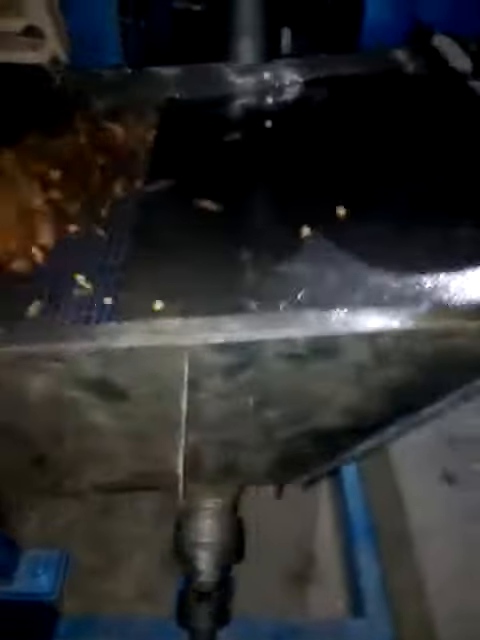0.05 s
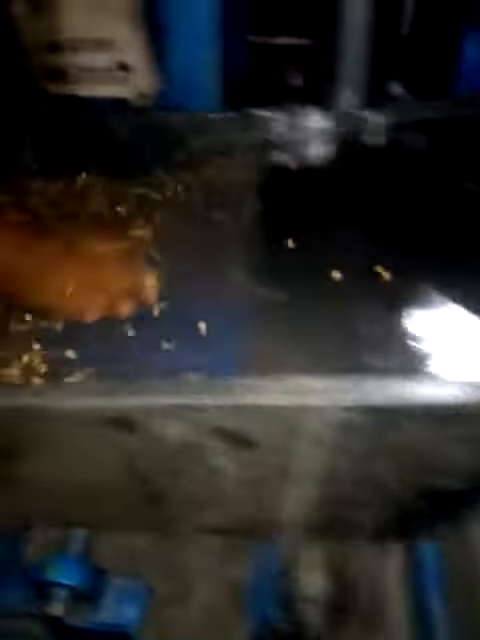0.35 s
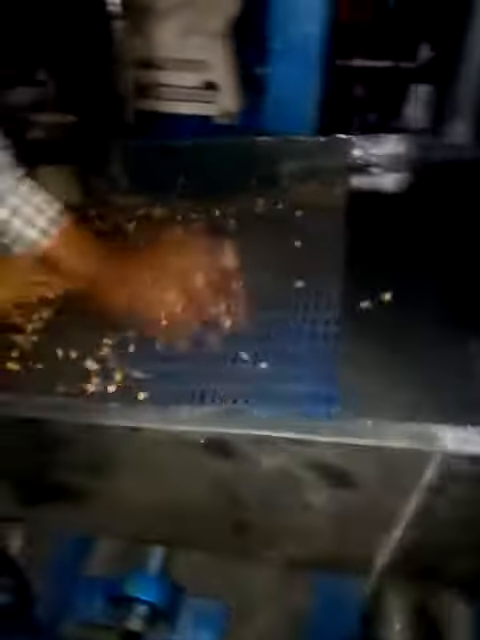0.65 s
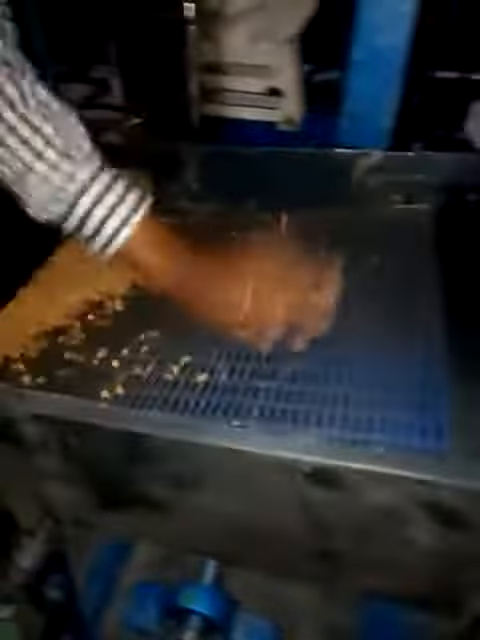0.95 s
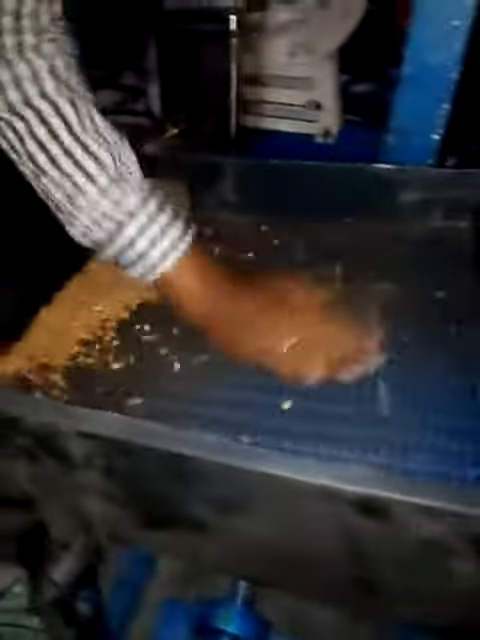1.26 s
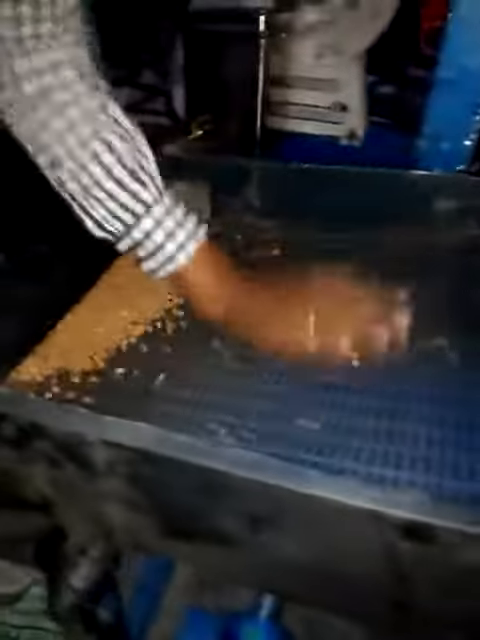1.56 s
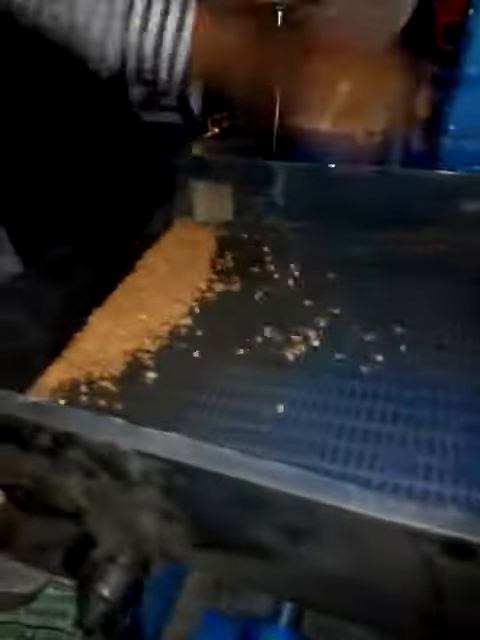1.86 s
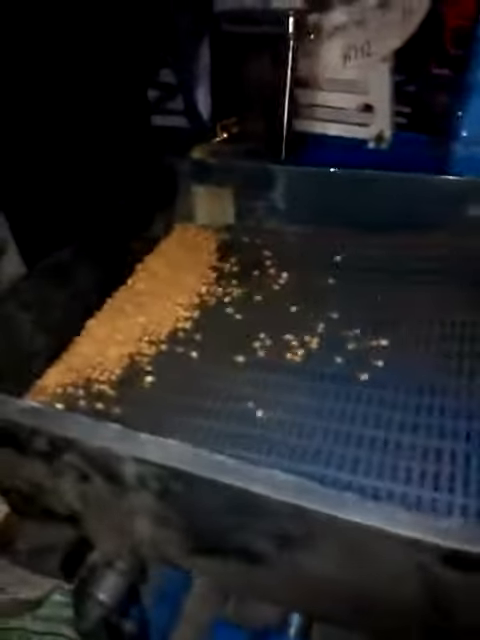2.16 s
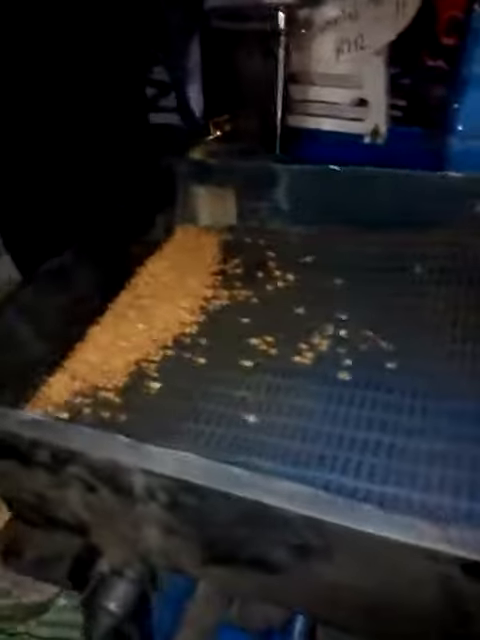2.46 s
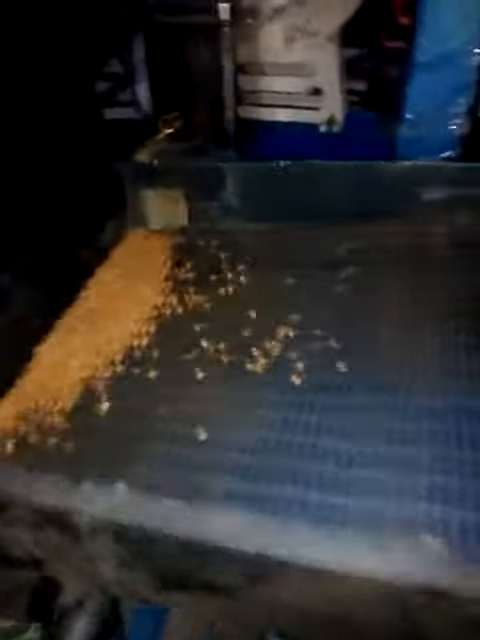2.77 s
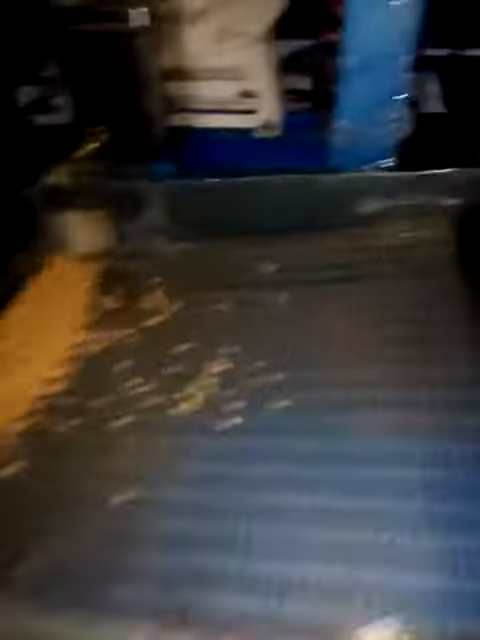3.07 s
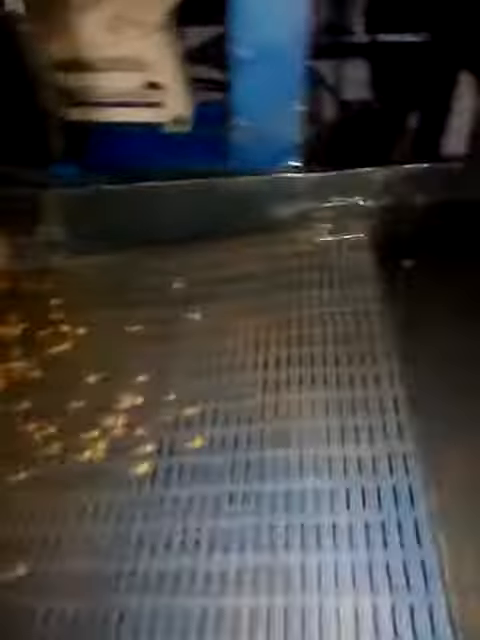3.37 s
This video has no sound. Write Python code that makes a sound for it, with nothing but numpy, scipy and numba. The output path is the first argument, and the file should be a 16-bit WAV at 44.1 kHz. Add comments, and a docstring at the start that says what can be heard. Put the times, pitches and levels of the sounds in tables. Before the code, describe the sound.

A loud, bright rush of grain on a steel screen continues throughout, close to the microphone and leaning left. Far beneath it are the low rumble of a small mill and the quick, faint knocking of its sieve. Early on, a hand moving the grain sets off a short run of dull metal clatters with a slight workshop echo. The hiss then carries on, and the motor's rough drone grows a little toward the end.

```python
"""Small grain mill in a workshop

Heard from just above the shaking sieve, thousands of kernels a second strike the steel and merge
into a loud hiss. The drive rumbles, and the sieve knocks once a stroke. For a few seconds the tray
clatters as a hand works the grain across it. The hiss overloads the left microphone."""
import sys
import numpy as np
from scipy import signal
from scipy.fft import rfft, irfft
from scipy.io import wavfile
from scipy.ndimage import uniform_filter1d, map_coordinates
from numba import njit

SR = 44100
rng = np.random.default_rng(int(sys.argv[2]) if len(sys.argv) > 2 else 0)


def to_wav(s):
    """Save 16-bit WAV."""
    ch = np.atleast_2d(s).T  # columns
    pcm = np.round(np.clip(ch, -1, 1) * 32767)  # PCM
    wavfile.write(sys.argv[1], SR, pcm.astype(np.int16))


N = 313110


# how strongly the grain flows: t/s, relative level/dB, left minus right/dB
GRAIN_FLOW = [(0.0, -13.3, 7), (4.2, -13, 9.3), (5.7, -12.45, 8.4), (7.1, -12.5, 8.6)]
# how sharp the impacts sound: t/s, treble boost/dB
SHARPNESS = [(0, 0), (2.5, -.4), (4.4, -1.6), (6.1, 2.1), (7.1, .4)]
def grain(left_db, right_db):
    """Kernels hiss on the steel screen; each microphone hears its own patch of it."""
    level_db, pan_db = curves(GRAIN_FLOW)
    extra_treble = undb(curves(SHARPNESS)[0]) - 1
    ears = []
    for ear, ear_db in enumerate([left_db + pan_db / 2, right_db - pan_db / 2]):
        hiss = screen_ring(kernels(ear), ear)
        if ear == 0:  # heard on the left only
            hiss = bright_resonance(hiss)
        hiss = hiss + extra_treble * band(hiss, hz=5950, width_hz=1200)
        hiss = wall_echo(hiss, lag_s=0.00141, sway_s=.00008, echo_db=-20.5)
        ears.append(unit(hiss) * undb(level_db + ear_db))
    return np.array(ears)


# tone of kernels hitting steel: f/Hz, left level/dB, right level/dB
KERNEL_TONE = [(1000.0, -20.5, -26), (1600.0, -18, -25.5), (2065, -15.0, -20), (2660, -9.5, -16),
               (3260, -6.5, -14.2), (4040, -1.44, -14), (4650.0, 0.5, -14.5), (5280, -3, -14),
               (6070, -5.5, -12.1), (6550, -10, -10), (7150, -15, -17), (8110, -23, -22.5),
               (10660, -31.5, -29), (15000.0, -31.7, -32.5)]
def kernels(ear, per_second=30000, size_spread_db=1, scatter_t60=0.0125):
    """Countless unequal impacts, each scattered through the hopper; ear 0 is left, 1 is right."""
    struck = rng.random(N) < per_second / SR
    impacts = struck * rng.standard_normal(N) * undb(size_spread_db * rng.standard_normal(N))
    t = np.arange(SR // 100) / SR
    burst = rng.standard_normal(len(t)) * fade(t, scatter_t60)
    scatter = np.exp(1j * np.angle(rfft(burst, N)))  # smears each click but keeps its tone
    scattered = irfft(rfft(impacts) * scatter, N)
    hiss = signal.sosfilt(signal.butter(2, 800, "high", fs=SR, output="sos"), scattered)
    return colour(hiss, np.array(KERNEL_TONE)[:, [0, ear + 1]])


# pitches at which the screen rings: f/Hz, width/Hz, left boost/dB, right boost/dB
SCREEN_RINGS = [(1890, 110, 1, 3.5), (2600, 180, 0, 2.5), (3266, 83, 2.5, 1), (3950, 110, 1.5, -2),
                (6250, 120, 1.5, 1), (6560, 72, 2.5, 2.5), (7420, 250, 0.5, 2.3), (8480, 230, 3, 4.2),
                (9060, 160, 4, 3), (10300, 170, 3.5, 3.5)]
def screen_ring(hiss, ear, wander_db=1.8):
    """The struck screen rings, and each ring swells and sinks as the grain shifts over it."""
    for hz, width, *boost_db in SCREEN_RINGS:
        gain = undb(boost_db[ear] + wander_db * walk(5))
        hiss = hiss + (gain - 1) * band(hiss, hz, width)
    return hiss


# pitch of a bright resonance in the hiss: t/s, f/Hz
BRIGHT_PITCH = [(0.0, 4610), (0.73, 4800), (4.2, 4570), (6.6, 4780), (7.1, 4650)]
def bright_resonance(hiss, boost_db=1.6, width_hz=290.0):
    """A narrow part of the hiss near 4.7 kHz stands out and drifts slowly in pitch."""
    return hiss + (undb(boost_db) - 1) * moving_band(hiss, curves(BRIGHT_PITCH)[0], width_hz)


def wall_echo(x, lag_s, sway_s, echo_db):
    """Sound bounces off the tray wall; its path changes as the hand-held microphone sways."""
    delay_samples = (lag_s + sway_s * walk(0.76)) * SR
    echo = map_coordinates(x, [np.arange(N) - delay_samples], order=1, mode="nearest")
    return x + undb(echo_db) * echo


# clatters of the tray, about seven a second: t/s, relative level/dB, favoured pitch f/Hz
TRAY_HITS = [(1.023, -6.8, 520), (1.195, -10.5, 560), (1.345, -12, 345), (1.385, -12.5, 600),
             (1.529, -17, 307), (1.634, -11.5, 339), (1.779, -13, 374), (1.929, -16, 363),
             (2.069, -16, 536), (2.189, -13.5, 339), (2.309, -15, 503), (2.439, -15.5, 194),
             (2.58, -12, 480), (2.721, -11.3, 519), (2.869, -15, 355), (2.985, -13.5, 256),
             (3.129, -11.5, 482), (3.269, -12.5, 495), (3.399, -11, 377), (3.519, -15.5, 258)]
def clatter(rebound_s=.048, rebound_db=-7.5):
    """The tray rattles as grain is worked over it; a weaker bounce follows each blow."""
    track = np.zeros(N)
    for s, db, hz in TRAY_HITS:
        for delay_s, blow_db in [(0, db), (rebound_s, db + rebound_db)]:
            rise_s = .009 * undb(-13 - blow_db)  # harder blows build up faster
            blow = tray_blow(hz, focus_db=11, crunch_db=2.2, crunch_t60=.25, rise_s=rise_s, vary_db=2)
            add(track, s + delay_s, undb(blow_db) * blow)
    return track


# how hard the sieve knocks: t/s, relative level/dB
KNOCK_STRENGTH = [(0, -3), (.5, -7), (4.0, 0), (4.8, -2), (5.5, 1.5), (6.3, 0), (7.1, -3.5)]
def shaker(first_s=.067, stroke_s=.2243, loose_s=.003, loose_db=.7, loose_pitch=.05):
    """The crank throws the sieve to and fro, one knock a turn; loose joints make no two alike."""
    track = np.zeros(N)
    strokes = np.arange(first_s, N / SR, stroke_s)
    for s, (late, hard, high) in zip(strokes, rng.standard_normal((len(strokes), 3))):
        hz = 490 * (1 + loose_pitch * high)
        blow = tray_blow(hz, focus_db=9, crunch_db=-5, crunch_t60=0.21, rise_s=0.0056, vary_db=2.5)
        add(track, s + loose_s * late, undb(loose_db * hard) * blow)
    return track * undb(curves(KNOCK_STRENGTH)[0])


# pitches at which the sheet-metal tray rings: f/Hz, level/dB, time to fade by 60 dB (t60)/s
TRAY_RINGS = [(105, -8, 0.11), (199, -6.5, 0.11), (272, -8.5, 0.19), (338, -1.8, 0.1), (361.3, -7, 0.17),
              (447, -5, 0.13), (492, -0.5, 0.13), (512.4, -5, 0.18), (547.4, -3.5, 0.18), (634, -7, 0.12),
              (783, -6, 0.16), (854, 1, 0.074), (946, -8, 0.078), (1180, -11, .1), (1370, -14, .08)]
# dull tone of grain thrown against the tray: f/Hz, level/dB
CRUNCH_TONE = [(50, -27), (120, -6), (300, 1), (550, -3), (900, -3.5), (1500, -5.5), (3000, -21),
               (6000, -38)]
def tray_blow(pitch_hz, focus_db, crunch_db, crunch_t60, rise_s, vary_db):
    """One blow: the tray rings, most near pitch_hz, and loose grain crunches against it."""
    t = np.arange(SR // 4) / SR
    hz, db, t60 = np.transpose(TRAY_RINGS)[:, :, None]
    size, detune, phase = rng.standard_normal((3, len(hz), 1))
    octaves_away = np.abs(np.log2(hz / pitch_hz))
    db = db + vary_db * size - focus_db * octaves_away
    tones = np.sin(2 * np.pi * (hz * (1 + 0.024 * detune) * t + phase))
    ring = np.sum(undb(db) * fade(t, t60) * tones, axis=0)
    crunch = colour(rng.standard_normal(len(t)), CRUNCH_TONE) * fade(t, crunch_t60)
    blow = (unit(ring) + undb(crunch_db) * unit(crunch)) * (1 - np.exp(-t / rise_s))
    return blow / np.sqrt(np.mean(blow[:SR // 50] ** 2))  # the first 20 ms set the strength


# tone of the rumbling frame: f/Hz, level/dB
FRAME_TONE = [(25, -14), (55, -19), (80, -10), (115, 0.6), (155, -2.7), (200, 1.5), (280, -1), (400, 0),
              (570, -2), (820, -2), (1050, -5.5), (1200, -4.5), (1500, -14), (2500, -25.5)]
# pitches at which the frame rings: f/Hz, width/Hz, boost/dB
FRAME_RINGS = [(190, 20, 3.5), (238, 16, 0), (387, 24, 0.5), (650, 23, 3), (795, 22, 5), (876, 26, 3.5),
               (1185, 36, 3.5)]
# the drive, which swells near the end: t/s, relative rumble level/dB, relative drone level/dB
DRIVE_LEVELS = [(0, -28.3, -48), (2.7, -26.8, -41), (4.3, -28.5, -44), (5.25, -27.6, -43),
                (5.4, -27, -35.5), (6.4, -26.6, -36.5), (6.75, -26.6, -30.5), (7.1, -26, -41)]
def drive(drone_db, drone_hz, filter_width_hz):
    """The frame rumbles unevenly and the motor shakes out one low, rough drone."""
    frame_db, motor_db = curves(DRIVE_LEVELS)
    mid, side = (unit(colour(noise, FRAME_TONE, FRAME_RINGS)) for noise in rng.standard_normal((2, N)))
    rumble = spread(mid, side, apart_hz=900) * undb(frame_db + 0.56 * walk(20))
    drone = band(rng.standard_normal(N), drone_hz, filter_width_hz)
    drone = unit(band(drone, drone_hz, filter_width_hz))  # a second pass makes the pitch clearer
    return rumble + drone * undb(motor_db + drone_db)


def workshop(x, t60, echo_db):
    """The direct sound, plus a short wash of echoes from the walls."""
    t = np.arange(SR // 2) / SR
    tails = rng.standard_normal((2, len(t))) * fade(t, t60)
    mid, side = (signal.fftconvolve(x, tail / np.linalg.norm(tail))[:N] for tail in tails)
    return x + undb(echo_db) * spread(mid, side, apart_hz=600)


def spread(mid, side, apart_hz):
    """Bass reaches both microphones alike; above apart_hz they hear unrelated sound."""
    f = np.fft.rfftfreq(N, 1 / SR)
    alike = .92 / (1 + (f / apart_hz) ** 4)
    mid = irfft(rfft(mid) * np.sqrt(1 + alike), N)
    side = irfft(rfft(side) * np.sqrt(1 - alike), N)
    return np.array([mid + side, mid - side]) / np.sqrt(2)


def colour(x, outline, rings=()):
    """Shape a sound's tone by an outline (f/Hz, level/dB), with ringing peaks on top."""
    f = np.maximum(np.fft.rfftfreq(x.shape[-1], 1 / SR), 1)
    hz, db = np.transpose(outline)
    gain_db = np.interp(np.log(f), np.log(hz), db)
    for centre, width, boost_db in rings:
        gain_db = gain_db + boost_db / (1 + (2 * (f - centre) / width) ** 2)
    return irfft(rfft(x) * undb(gain_db), x.shape[-1])


def band(x, hz, width_hz):
    """Keep the part of a sound near one pitch."""
    return signal.lfilter(*signal.iirpeak(hz, hz / width_hz, fs=SR), x)


@njit
def moving_band(x, hz, width_hz):
    """Like band, but the pitch may move every sample."""
    y, band_state, low_state = np.empty(len(x)), 0., 0.
    for i in range(len(x)):
        tuning, damping = np.tan(np.pi * hz[i] / SR), width_hz / hz[i]
        ring = (band_state + tuning * (x[i] - low_state)) / (1 + tuning * (tuning + damping))
        band_state = 2 * ring - band_state
        low_state += 2 * tuning * ring
        y[i] = damping * ring
    return y


def walk(per_second):
    """A smooth random wander, typically of size 1."""
    hold = int(SR / per_second)
    steps = np.repeat(rng.standard_normal(N // hold + 1), hold)
    return unit(uniform_filter1d(uniform_filter1d(steps, hold), hold)[:N])


def curves(table):
    """Join a timed table's points with lines: one curve for each column after the time."""
    s, *columns = np.transpose(table)
    return [np.interp(np.arange(N) / SR, s, column) for column in columns]


def fade(t, t60):
    """Die away by 60 dB every t60 seconds."""
    return np.exp(-np.log(1000) * t / t60)


def add(track, s, sound):
    """Mix a sound into a track at s seconds."""
    start = max(int(s * SR), 0)
    part = sound[:max(N - start, 0)]
    track[start:start + len(part)] += part


def undb(db):
    """Turn decibels into a number to multiply by."""
    return 10 ** (np.asarray(db) / 20)


def unit(x):
    """Scale to an average strength (rms) of 1."""
    return x / np.sqrt(np.mean(x ** 2))


def scene():
    """Grain hiss over the knocks and rumble of the machine."""
    knocks = workshop(shaker() * undb(-26.2) + clatter() * undb(-11), t60=.25, echo_db=-11)
    machine = knocks + drive(drone_db=-1, drone_hz=98, filter_width_hz=20)
    hiss = grain(left_db=2.08, right_db=1.45)
    return hiss + machine * undb([[-.3], [.4]])  # the machine is a little louder on the right


def record(dry, ceiling=0.92, hardness=7.9, top_hz=15300):
    """The overloaded microphone rounds off the loudest peaks; the highest treble is cut."""
    rounded = dry / (1 + np.abs(dry / ceiling) ** hardness) ** (1 / hardness)
    return signal.sosfilt(signal.ellip(10, .2, 70, top_hz, fs=SR, output="sos"), rounded)


dry = scene()
out = record(dry)
to_wav(out)
```